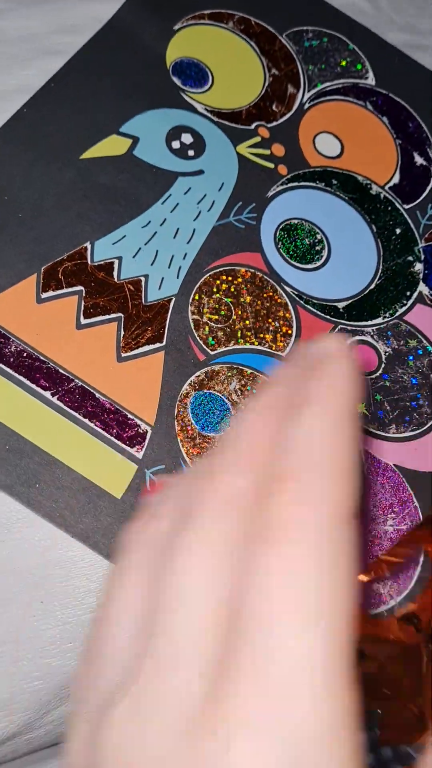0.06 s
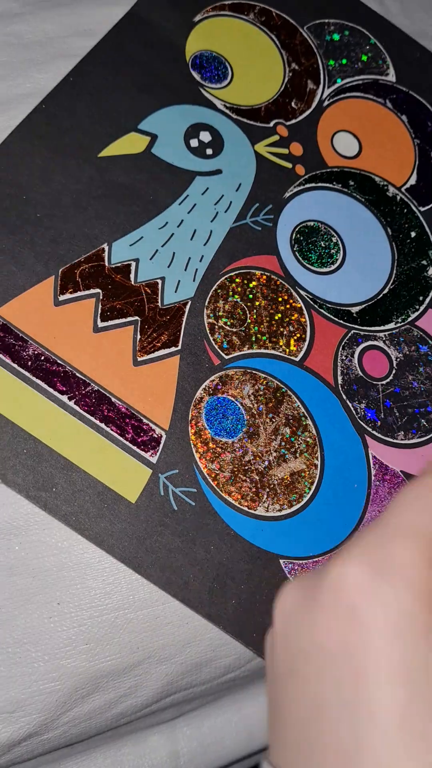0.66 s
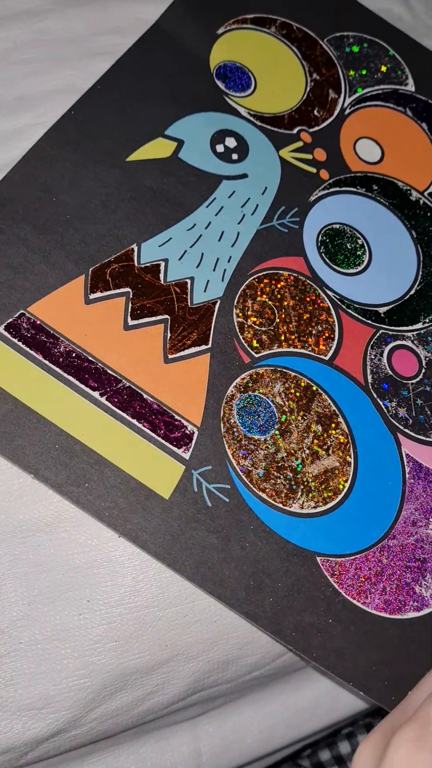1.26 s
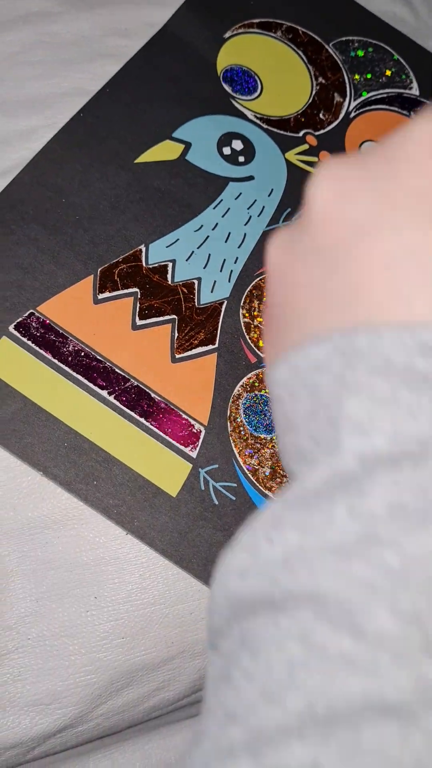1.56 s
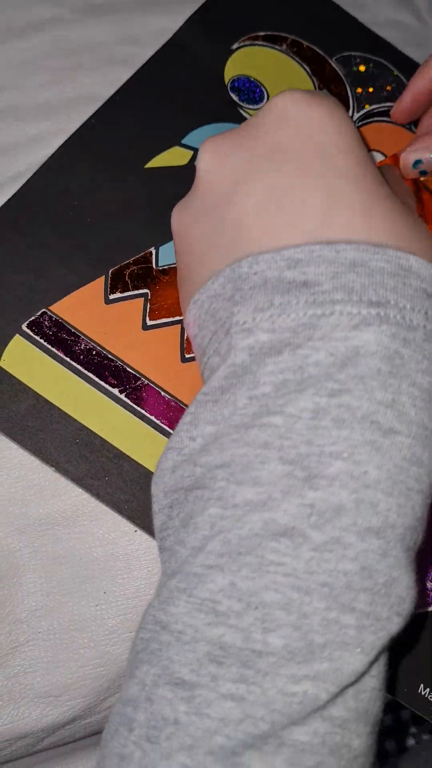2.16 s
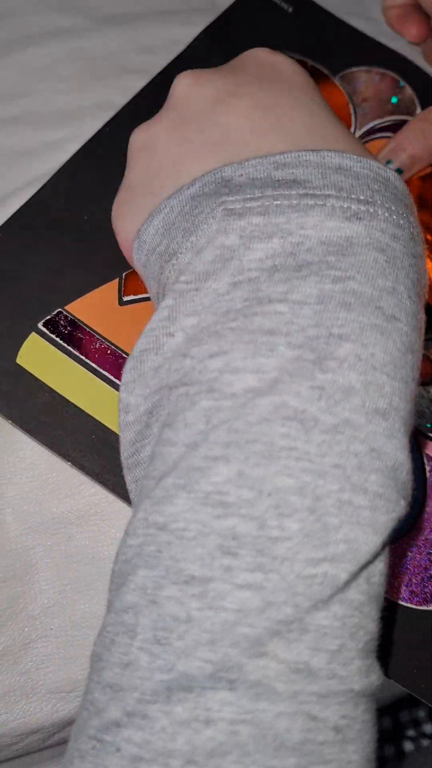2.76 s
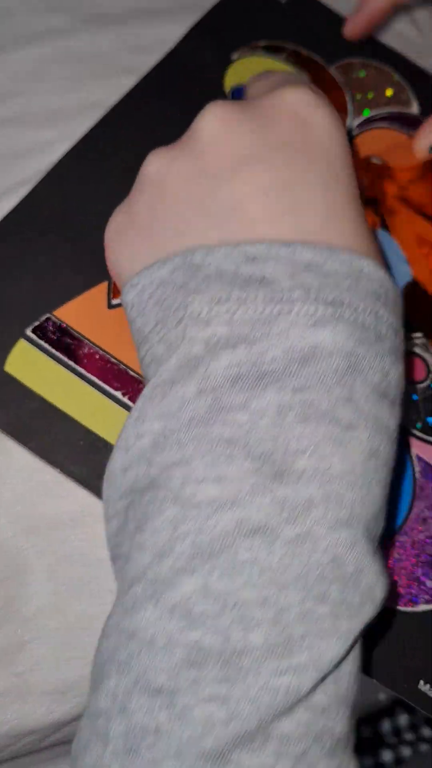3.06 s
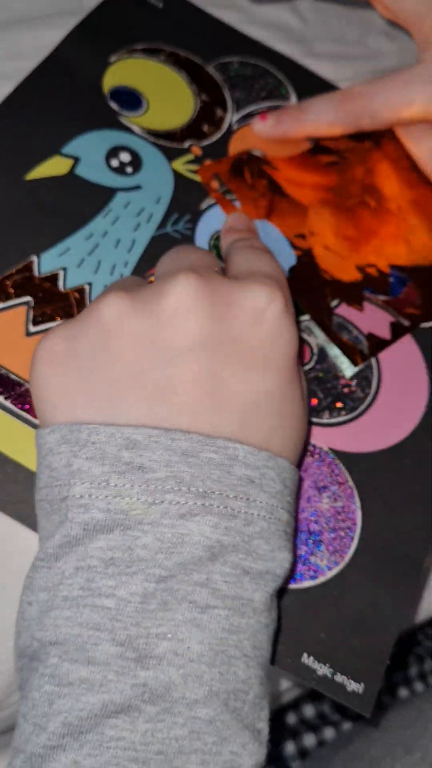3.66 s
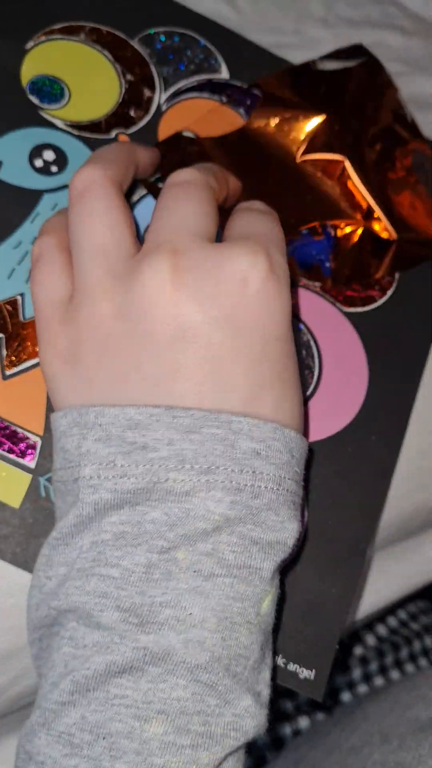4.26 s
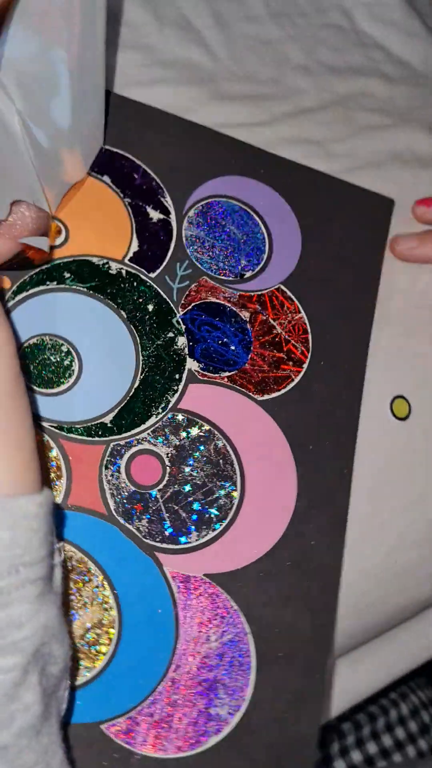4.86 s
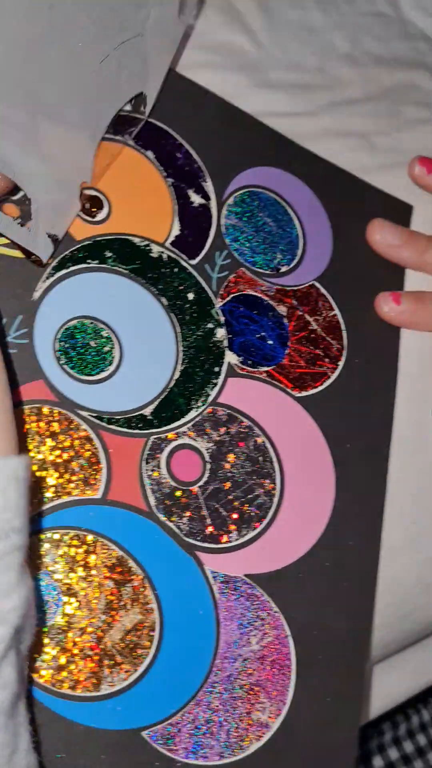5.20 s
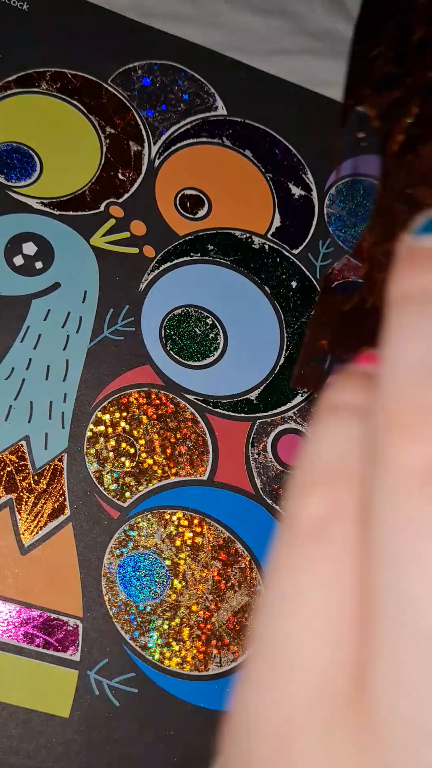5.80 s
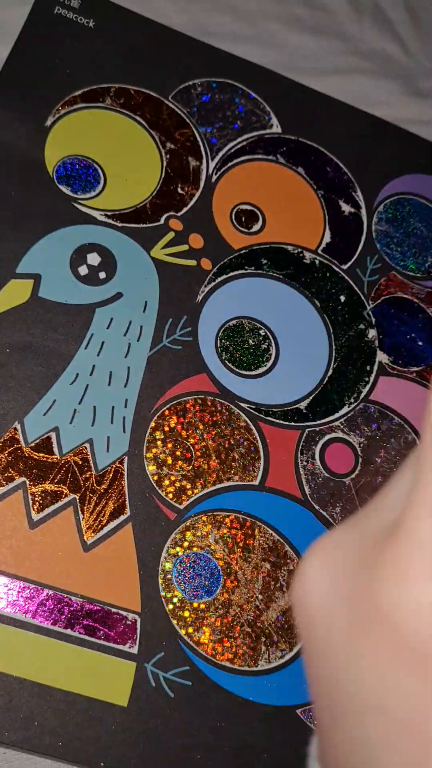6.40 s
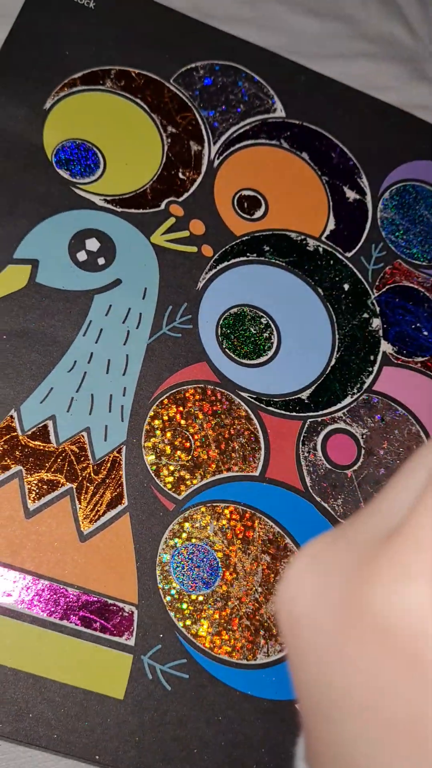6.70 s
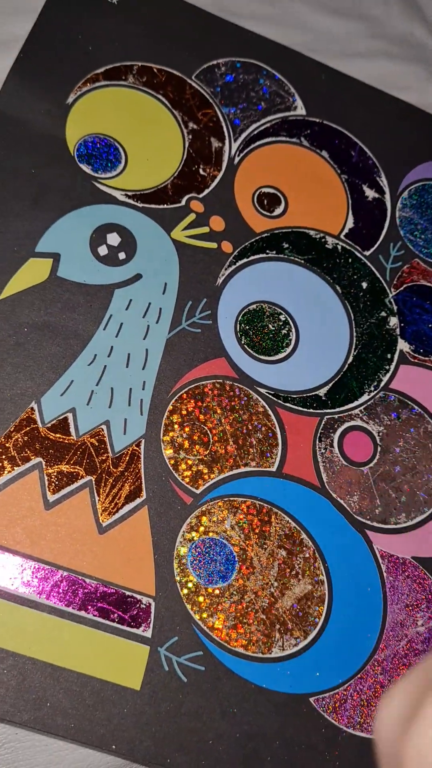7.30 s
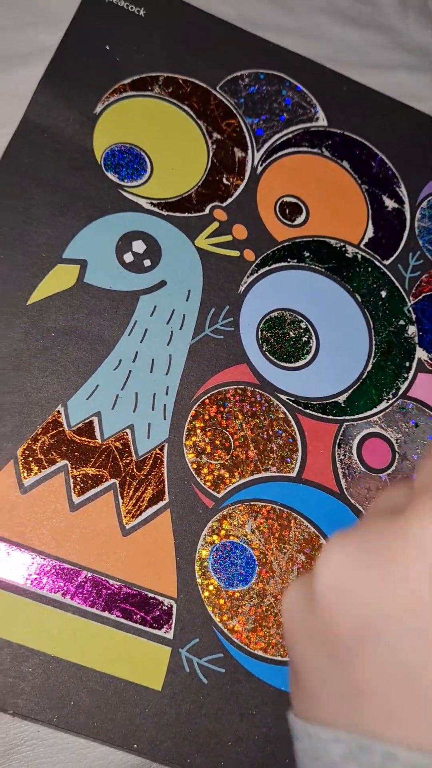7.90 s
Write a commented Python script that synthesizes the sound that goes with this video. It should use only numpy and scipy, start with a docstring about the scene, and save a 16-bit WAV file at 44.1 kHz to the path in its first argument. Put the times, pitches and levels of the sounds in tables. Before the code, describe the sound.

Thin metallic foil crinkles and crackles in irregular close bursts as hands press it onto card and peel it away.

```python
"""Thin metallic foil is handled, pressed onto sticky card and peeled off again, up close in a small room.
Its creases buckle in single snaps over a rustle of countless tiny ones; dragged flat, it scrapes hollowly.
Hands brush and pat the card, which lies on cloth, over still air and a faint hum.
The left microphone faces the foil; the right one is shaded, so the room counts for more there."""
import sys
import numpy as np
from scipy import signal
from scipy.io import wavfile

SR = 44100
rng = np.random.default_rng(int(sys.argv[2]) if len(sys.argv) > 2 else 0)


def bounce(signal):
    """Save signal as a 16-bit WAV file at the path given by the first command-line argument."""
    frames = np.transpose(np.atleast_2d(signal))
    limited = np.clip(frames, -1, 1)
    pcm = np.round(limited * 32767).astype(np.int16)
    wavfile.write(sys.argv[1], SR, pcm)


N = 355005
TIME = np.arange(N) / SR


def gain_of(db):
    """Decibels to amplitude."""
    return 10 ** (np.asarray(db) / 20)


def unit_rms(x):
    """Scales to rms 1."""
    return x / np.sqrt(np.mean(x ** 2) + 1e-20)


def curve_at(points, hz):
    """Reads a curve on a log-frequency axis."""
    f, value = np.transpose(points)
    return np.interp(np.log(hz + 1), np.log(f + 1), value)


def add(mix, s, sound):
    """Mixes a sound in at s seconds."""
    part = mix[..., max(round(s * SR), 0):][..., :sound.shape[-1]]
    part += sound[..., :part.shape[-1]]


def eq(x, points, size=4096):
    """Minimum-phase EQ, so attacks stay sharp."""
    log_gain = np.log(gain_of(curve_at(points, abs(np.fft.fftfreq(size, 1 / SR)))))
    taps = np.fft.ifft(np.exp(np.conj(signal.hilbert(log_gain)))).real[:size // 2]
    return signal.fftconvolve(x, taps)[:len(x)]


def crossover(x, hz):
    """The parts of x below and above hz, 12 dB an octave."""
    k = np.tan(np.pi * hz / SR)
    poles = [1 + np.sqrt(2) * k + k * k, 2 * (k * k - 1), 1 - np.sqrt(2) * k + k * k]
    return [signal.lfilter(zeros, poles, x) for zeros in (k * k * np.array([1, 2, 1]), [1, -2, 1])]


def shelf(x, bright_db, hz=6000):
    """High shelf; subtracts because the crossover's halves are in opposite phase."""
    low, high = crossover(x, hz)
    return low - gain_of(bright_db) * high


def wander(rate_hz):
    """Slow random modulation, rms 1."""
    return unit_rms(crossover(rng.standard_normal(N), rate_hz)[0])


def band_noise(size, hz, width_hz, order=1):
    """Noise ringing in one resonance, rms 1."""
    top = np.hypot(hz, width_hz / 2) + width_hz / 2
    band = signal.butter(order, [hz ** 2 / top, min(top, .45 * SR)], "band", fs=SR, output="sos")
    return unit_rms(signal.sosfilt(band, rng.standard_normal(size)))


def swell(middle_s, half_s):
    """A bell-shaped fade in and out."""
    return np.exp(-np.minimum(((TIME - middle_s) / half_s) ** 2, 20))


def mic_pair(left, right, lag_s):
    """Stereo pair: sound reaches the right microphone a little later."""
    n = np.arange(len(right))
    return np.array([left, np.interp(n - lag_s * SR, n, right, left=0)])


# The held foil's constant stir: (time [s], level [dB], tautness as treble tilt [dB])
FOIL_STIR = [(0, -54, -7), (.55, -56.5, -4), (.62, -65.5, -14), (1.1, -64, -15), (1.6, -64.5, -3),
             (2.5, -61, -4), (2.9, -67.5, -4), (3.24, -83.5, -4), (3.36, -72.5, 12), (3.65, -77.5, -19),
             (4.03, -68.5, -3), (4.13, -60, 2), (4.55, -48.5, -27), (4.95, -60, -13), (5.3, -53.5, -8),
             (5.82, -65, -21.5), (5.96, -47, -16), (6.35, -62, 5), (6.66, -73.5, -7.5), (7.18, -79.5, -10),
             (7.62, -63.5, 6), (8.04, -72.5, -4)]
# Fingers squeeze, press or peel: (start [s], hold [s], level [dB], tautness [dB])
FOIL_SCRUNCHES = [(0.127, 0.066, -53, 1), (0.368, 0.12, -43, -4), (0.648, .045, -49.5, -6),
                  (0.816, 0.016, -54.5, -13), (1.208, 0.03, -55.5, -19), (1.36, 0.066, -55.5, -11),
                  (1.424, 0.023, -49, -8), (1.477, 0.039, -49, -10), (1.655, 0.036, -53, 6),
                  (1.744, 0.19, -57, 2), (2.045, 0.043, -56.5, 4), (2.556, 0.1, -46, -2),
                  (2.607, 0.052, -38, -6.5), (2.676, 0.041, -44, -2), (2.969, 0.093, -58.5, -18),
                  (3.289, 0.011, -64.5, -2), (3.667, 0.28, -71, 8.5), (4.099, .15, -41, 15),
                  (4.325, 0.059, -48, 10), (4.487, 0.066, -38.5, -8), (4.612, 0.18, -48, 6),
                  (4.992, 0.029, -55, -12), (5.085, 0.1, -38.5, 2), (5.224, 0.05, -42.5, -10),
                  (5.356, 0.048, -40.5, -5), (5.45, 0.016, -63.5, -10), (5.531, 0.016, -54, -18),
                  (5.845, .025, -38, 5), (5.978, 0.038, -32.5, 2.5), (6.083, 0.052, -34.5, 6),
                  (6.2027, 0.011, -36, 2), (6.39, 0.029, -52, -7), (6.485, 0.048, -61, -17),
                  (6.69, .13, -60, -9), (6.847, 0.058, -52, -6.5), (7.227, 0.13, -66, 8),
                  (7.336, 0.072, -55.5, -4), (7.532, 0.059, -50, -12), (7.736, 0.051, -50, -4),
                  (7.819, 0.1, -47.5, 2), (8.009, .03, -52, 9)]


def handling(grip_s=0.018, tire_db_per_s=11, relax_db_per_s=260):
    """Work on the foil and its tautness, in dB: over the stir, each scrunch builds, eases and lets go."""
    times, *columns = np.transpose(FOIL_STIR)
    stir_db, stir_taut_db = (np.interp(TIME, times, c) for c in columns)
    power = gain_of(stir_db) ** 2
    weighted_taut = power * stir_taut_db
    t = np.arange(SR // 2) / SR
    for s, hold_s, db, taut_db in FOIL_SCRUNCHES:
        fade_db = tire_db_per_s * t + relax_db_per_s * np.maximum(t - hold_s, 0)
        scrunch = (np.minimum(t / grip_s, 1) * gain_of(db - fade_db)) ** 2
        add(power, s, scrunch)
        add(weighted_taut, s, scrunch * taut_db)
    return 10 * np.log10(power), weighted_taut / power


def rustle(work_db, taut_db, spread_db=3.5, ring_s=.001, buckle_db=-60, hiss=0.63, clump_db=2.74):
    """Tiny creases tick in clumps, each at its own pitch, over the hiss of foil rubbing on itself."""
    crowd = np.clip(gain_of(.7 * (work_db + 55.5)), .15, 6)  # harder work buckles more creases at once
    at = np.flatnonzero(rng.random(N) < crowd * 450 / SR)
    size = gain_of(spread_db * np.minimum(rng.exponential(1, N), 4)) / np.sqrt(crowd)
    hz = rng.uniform(1500, 16000, N)[at, None]
    right_lag = rng.integers(10, 16, N)[at, None]
    n = np.arange(200)
    fade = size[at, None] * np.exp(-n / SR / ring_s)
    tones = fade * np.sin(2 * np.pi * hz * n / SR)
    where, ticks = at[:, None] + n, []
    for place, scratch in zip((where, where + right_lag), rng.standard_normal((2, N))):
        rings, power = (np.bincount(place.ravel(), v.ravel(), N)[:N] for v in (tones, fade ** 2))
        ticks.append(rings + np.sqrt(power) * scratch)
    buckling = 1 / (1 + gain_of(buckle_db - work_db))  # light work hisses, hard work crackles
    crackle = buckling * unit_rms(np.array(ticks))
    sheet = (crackle + hiss * rng.standard_normal((2, N))) / np.hypot(buckling, hiss)
    sheet *= unit_rms(gain_of(clump_db * wander(35)))
    bright_db = taut_db - 3
    shelf_rms = np.sqrt(0.36 + .5 * gain_of(bright_db) ** 2)  # tautness changes colour, not power
    return gain_of(work_db) * shelf(sheet, bright_db) / shelf_rms


# Skin and sleeve on the card: (middle [s], level [dB], half length [s], rub pitch [Hz])
HAND_STROKES = [(0.2, -69, 0.57, 660), (0.492, -63, 0.12, 820), (1.85, -75, .12, 255),
                (2.084, -67, 0.074, 505), (2.651, -57, 0.052, 620), (3.011, -64.5, 0.034, 650),
                (3.362, -70.5, .1, 417), (3.87, -69.5, 0.16, 267), (4.139, -56, .051, 373),
                (5.14, -58.5, 0.037, 221.6), (5.922, -65.5, .05, 237), (6.014, -57.5, 0.054, 1150),
                (6.209, -53, 0.017, 1280), (6.617, -74, 0.22, 425), (7.875, -62, 0.11, 1660)]


def brush(work_db, catch_db=3.0, press_db=-24):
    """Skin and sleeve drag over the card, catching unevenly; working the foil rubs the card too."""
    rub = gain_of(work_db + press_db) * band_noise(N, hz=430, width_hz=480, order=2)
    for s, db, half_s, hz in HAND_STROKES:
        rub += gain_of(db) * swell(s, half_s) * band_noise(N, hz, 0.99 * hz, order=2)
    return rub * gain_of(catch_db * wander(53))


# Flat drags: (middle [s], level [dB], half length [s], stiffness [pitch ratio], right over left [dB])
FOIL_DRAGS = [(0.15, -62, 0.23, 1.3, 3.5), (0.49, -56.5, .08, 1.1, 7.5), (1.45, -67.5, .1, 1.05, -6),
              (1.721, -64, .2, 1.8, 4), (2.447, -64.5, 0.16, 1.0, 1.5), (2.998, -66, 0.025, 0.88, 8.5),
              (4.5, -58, .18, 1.05, -3), (5.32, -51.5, 0.12, 1.62, -4.5), (7.85, -59.5, 0.13, 1.17, 5)]
# The sliding sheet's resonances: (pitch at stiffness 1 [Hz], width [Hz], level [dB])
SHEET_MODES = [(1934, 510, 5.5), (3300, 960, -0.5), (4320, 830, -11.5)]


def slide(trim_db=-2, catch_db=3, flex=0.022):
    """Flat foil scrapes hollowly over card; its resonances differ by drag and shift as the sheet flexes."""
    drags = np.array([gain_of([[db], [db + right_db]]) * swell(s, half_s)
                      for s, db, half_s, _, right_db in FOIL_DRAGS])
    loudest = drags[:, 0].argmax(0)
    stiffness = np.array(FOIL_DRAGS)[loudest, 3]
    bend = stiffness * (1 + flex * wander(2))
    scrape = np.zeros((2, N))
    for hz, width_hz, db in SHEET_MODES:
        carrier = np.exp(2j * np.pi * np.cumsum(hz * bend) / SR)
        real, imag = crossover(rng.standard_normal((2, 2, N)), width_hz / 2)[0]
        scrape += gain_of(db) * unit_rms((carrier * (real + 1j * imag)).real)
    return drags.sum(0) * gain_of(trim_db + catch_db * wander(28)) * unit_rms(scrape)


# Room tone: (frequency [Hz], gain [dB])
AIR_EQ = [(25, -30.5), (60, 4), (130, -2), (300, -0.5), (500, -13.5), (1000, -9), (3000, -50),
          (9000, -13.5), (16000, -83)]


def air(level_db=-81, hum_hz=61, hum_db=-88, width=0.73):
    """Still room air, more alike left and right in the bass, with a faint wavering hum."""
    shared, left, right = (eq(z, AIR_EQ) for z in rng.standard_normal((3, N)))
    bed = unit_rms(crossover(shared, 420)[0] + width * np.array([left, right]))
    hum = np.sin(2 * np.pi * hum_hz * TIME + wander(16))
    return gain_of(level_db) * bed + gain_of(hum_db) * hum


LEAD = 200  # samples in which a crease gives way before it cracks


def crease(bright_db, ring_ms, give_db=-10, give_s=0.0014, crack_s=0.000073, ring_db=-9,
           flutter_db=-22, flutter_s=0.016, likeness=0.31):
    """A crease gives way and flips with a crack; its facet rings and bending waves rattle the sheet."""
    t = np.arange(-LEAD, 8 * LEAD) / SR
    after = np.maximum(t, 0)
    onset = np.where(t < 0, gain_of(give_db) * np.exp(-abs(t) / give_s), 1)
    ring = onset * gain_of(ring_db) * np.exp(-after * 1000 / max(ring_ms, .1))
    flutter = gain_of(flutter_db) * np.exp(-after / flutter_s)
    shape = ring + onset * (np.exp(-after / crack_s) + flutter)
    # small, bright facets ring high
    hz = np.clip(3300 * np.exp(0.04 * bright_db + 0.2 * rng.standard_normal()), 1500, 14000)
    cracks = []
    for noise in rng.standard_normal((2, len(t))):
        facet = 0.76 * ring * band_noise(len(t), hz, width_hz=600)
        crack = shelf(shape * noise + facet, bright_db + 3)
        cracks.append(crack / np.linalg.norm(crack))
    front, aside = cracks
    right = likeness * front + np.sqrt(1 - likeness ** 2) * aside
    return np.sqrt(SR / 1000) * mic_pair(front, right, lag_s=rng.uniform(.00024, .00034))


# Large creases buckling: (time [s], level [dB], brightness [dB])
CREASE_SNAPS = [(0.1107, -38, -4), (0.2775, -35.5, -2.5), (0.4533, -31.5, -9), (0.5336, -29, -8.5),
                (1.213, -36, -5), (1.3008, -48, -1), (1.3426, -39, -6.5), (1.4884, -30.5, 1.5),
                (1.5826, -40, 19), (1.6454, -40, 8), (1.766, -36, 1), (1.8204, -46, -12), (1.8679, -38, 0),
                (1.915, -41, 8), (2.0144, -43, 7), (2.0997, -52, -1), (2.1687, -44, -8), (2.2666, -43.5, 0),
                (2.415, -44.5, -2), (2.478, -42.5, -4), (2.526, -40, 3), (2.573, -27.5, 10),
                (2.626, -23.5, 11.5), (2.6447, -26.5, 4), (2.712, -43, 4), (2.833, -48, 8),
                (2.9696, -39, -3), (3.29, -49.5, 12), (3.311, -47.5, 29), (3.405, -53.5, 21),
                (3.5075, -51, 25), (3.8414, -47, 2), (4.1331, -26, 5.5), (4.2437, -27, 7),
                (4.3244, -35.5, 12), (4.4037, -27, 19.5), (4.4563, -34, 2), (4.4932, -33, 7),
                (4.5262, -20.5, 29), (4.5316, -24.5, -4), (4.5985, -27, 9.5), (4.6287, -26.5, -3),
                (4.6663, -22, 4.5), (4.689, -27, 9.5), (4.858, -38, 6), (4.9001, -29.5, 3),
                (4.9507, -38.5, -4), (5.019, -35, -8), (5.0618, -40, 10), (5.107, -35, 12),
                (5.124, -28, -5), (5.1811, -21.5, 1), (5.2963, -31.5, -2.5), (5.3648, -16, -2.5),
                (5.408, -24, 5), (5.4633, -31, 26), (5.474, -34, -5.5), (5.556, -39.5, 5),
                (5.6568, -32, 10), (5.8609, -25.5, 7.5), (5.9789, -25, 2), (6.0505, -26, -3),
                (6.1096, -26, 21), (6.2129, -20, 5), (6.492, -43, 36), (6.503, -35, 4), (6.5537, -44, -4),
                (6.7071, -42, 14), (6.8643, -31.5, 3), (7.012, -46, 5), (7.0884, -49, 10),
                (7.3101, -41, 13), (7.3328, -35, 5), (7.5204, -32.5, 8), (7.5545, -33.5, 5),
                (7.6285, -40.5, -8), (7.7249, -39.5, 0), (7.8376, -33, 1), (7.9378, -33, -6)]


def snaps(work_db, trim_db=3, ring_growth=0.35, small_per_s=26):
    """Large creases snap, the louder ringing longer, amid small ones that grow with work on the foil."""
    out = np.zeros((2, N))
    for s, db, bright_db in CREASE_SNAPS:
        ring_ms = 1.08 * gain_of(ring_growth * (db + 36.5))
        add(out, s - LEAD / SR, gain_of(db + trim_db) * crease(bright_db, ring_ms))
    for at in np.flatnonzero(rng.random(N) < small_per_s / SR):
        size, shine = rng.uniform(-1.7, 1.7, 2)
        db = min(work_db[at], -44) + 7 + 3 * size
        add(out, (at - LEAD) / SR, gain_of(db + trim_db) * crease(bright_db=6 + 5 * shine, ring_ms=1))
    return out


# The dull body of card on cloth: (frequency [Hz], gain [dB])
CARD_EQ = [(30, -20.5), (80, -2.5), (140, -1), (200, -6), (280, 3), (400, -8.5), (700, -10.5),
           (1100, -20.5), (3000, -32), (8000, -97.5)]
# Hands and fingers landing: (time [s], level [dB], decay [s], slap brightness [dB])
HAND_PATS = [(0.576, -48, 0.0027, 43), (1.803, -48.5, 0.0024, 3), (2.049, -58.5, 0.0096, 35),
             (2.167, -51.5, 0.0017, 38), (2.625, -50.5, 0.032, 13), (3.042, -44.5, 0.013, 12),
             (3.066, -55.5, 0.023, 18), (3.84, -41.5, 0.0043, 12.5), (4.524, -42, 0.0094, 26),
             (4.664, -53, 0.026, 21), (5.152, -38, 0.019, 0.5), (5.365, -51.5, 0.032, -5),
             (5.605, -57, 0.033, 10), (5.989, -51, 0.029, 3), (6.211, -60, 0.012, 27)]


def pats(trim_db=4, rise_s=0.00219, push_s=.0013):
    """A hand lands on the card: one padded push, then the card shivers on the cloth."""
    out, t = np.zeros(N), np.arange(SR // 4) / SR
    pulse = (t / push_s) * (1 - t / push_s / 2) * np.exp(-t / push_s)
    push = unit_rms(eq(pulse, CARD_EQ))
    for s, db, decay_s, slap_db in HAND_PATS:
        shape = (1 - np.exp(-t / rise_s)) * np.exp(-t / max(decay_s, .003))
        shiver = unit_rms(eq(shape * rng.standard_normal(len(t)), CARD_EQ))
        firmness = 0.45 * np.exp(-decay_s / 0.018)  # slow landings give little push
        knock = shelf(shiver + firmness * push, slap_db - 11, hz=420)
        add(out, s - rise_s, gain_of(db + trim_db) * knock * np.linalg.norm(shape) / np.linalg.norm(knock))
    return out


# Soft leans on the cloth: (middle [s], level [dB], half length [s])
WEIGHT_SHIFTS = [(1.134, -84, 0.042), (2.372, -73, 0.059), (3.904, -73, 0.097), (5.171, -58, 0.031),
                 (6.522, -75.5, 0.049), (7.192, -55.5, 0.037), (7.753, -64, 0.038)]


def bumps(band_hz=(32, 84)):
    """Weight shifts on the cloth: low, soft swells."""
    band = signal.butter(2, band_hz, "band", fs=SR, output="sos")
    out, t = np.zeros(N), np.arange(SR // 2) / SR
    for s, db, half_s in WEIGHT_SHIFTS:
        shape = np.exp(-((t - t.mean()) / half_s) ** 2)
        rumble = shape * signal.sosfilt(band, rng.standard_normal(len(t)))
        add(out, s - t.mean(), gain_of(db) * rumble * np.linalg.norm(shape) / np.linalg.norm(rumble))
    return out


# Reverb send: (frequency [Hz], gain [dB])
SEND_EQ = [(100, -12.5), (400, -20), (1800, -5), (3300, -1), (7000, -13.5), (15000, -35)]
# Reverb decay: (frequency [Hz], time to fall 60 dB [s])
REVERB_TIMES = [(200, 0.6), (1500, 0.26), (3500, 0.11), (8000, 0.1), (15000, 0.27)]


def room(x, first_s=0.0043, walls_s=0.014, near=0.57, echoes_per_s=5000):
    """Faint echoes from nearby things, then the walls; each band dies at its own speed."""
    size = SR // 2
    taps = rng.choice([-1., 1.], (2, size)) * (rng.random((2, size)) < echoes_per_s / SR)
    taps *= np.interp(np.arange(size) / SR, [first_s, walls_s, walls_s + 0.0012], [near, near, 1], left=0)
    hz, t, bands = signal.stft(taps, SR, nperseg=128)
    fade = gain_of(-60 * t / curve_at(REVERB_TIMES, hz)[:, None])
    tail = signal.istft(bands * fade, SR, nperseg=128)[1]
    tail /= np.linalg.norm(tail, axis=1, keepdims=True)
    return signal.fftconvolve(eq(x, SEND_EQ)[None], tail, axes=1)[:, :N]


# The foil's thin, bright voice: (frequency [Hz], gain [dB])
FOIL_EQ = [(100, -18.5), (400, -14.5), (900, -11), (1400, -6.5), (2000, -2.5), (2500, -4.5), (3200, -3.5),
           (4500, -0.5), (6500, -1.5), (9000, -1.5), (11500, 2.5), (13500, 1.5), (15700, 0), (16500, -29)]
# Shading of the foil at the right microphone: (frequency [Hz], gain [dB])
SHADE_EQ = [(200, 3), (1200, 3.5), (2200, -1), (3200, 5.5), (4300, -1), (6200, -7), (7300, 1), (8800, -11),
            (12000, -7.5), (15500, -7.5)]


def scene(card_right_db=-3, room_right_db=-2):
    """Foil and card, heard directly and through the room."""
    work_db, taut_db = handling()
    front, aside = (eq(x, FOIL_EQ) for x in snaps(work_db) + rustle(work_db, taut_db))
    foil = np.array([front, eq(aside, SHADE_EQ)])
    card = pats() + brush(work_db) + bumps()
    direct = foil + mic_pair(card, gain_of(card_right_db) * card, lag_s=0.00022) + slide()
    reverb = gain_of([[0], [room_right_db]]) * room(front + card)
    return direct + reverb + air()


def record(dry):
    """A steep high cut at 16.3 kHz."""
    high_cut = signal.firwin(255, 16300, window=("kaiser", 9), fs=SR)
    return signal.oaconvolve(dry, high_cut[None], "same")


dry = scene()
out = record(dry)
bounce(out)
```